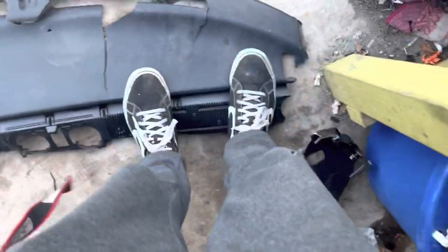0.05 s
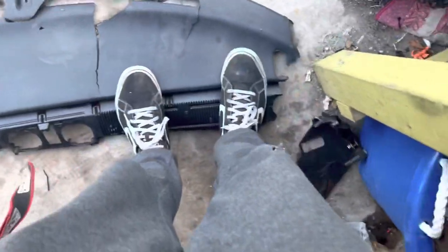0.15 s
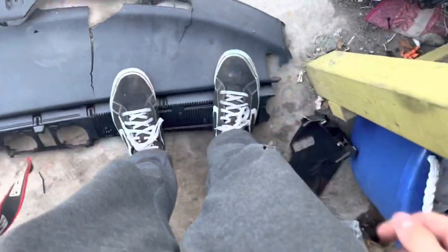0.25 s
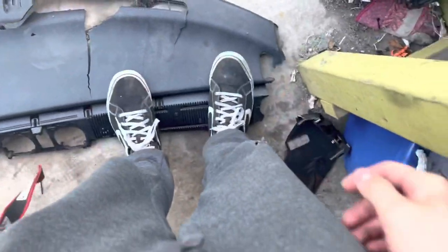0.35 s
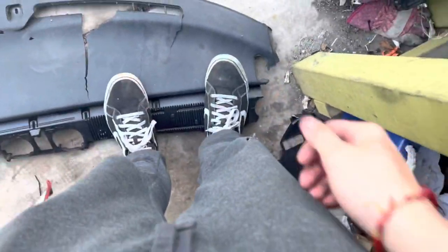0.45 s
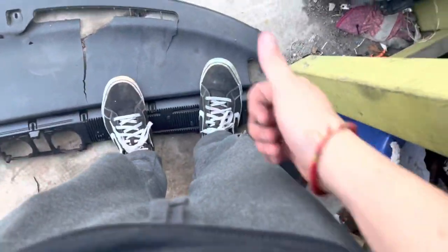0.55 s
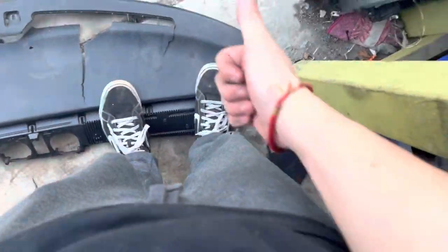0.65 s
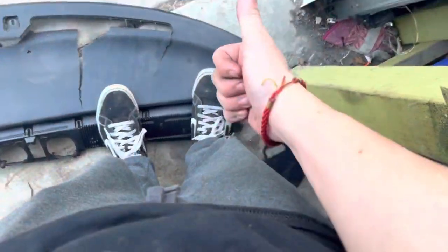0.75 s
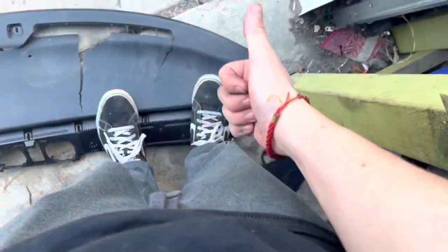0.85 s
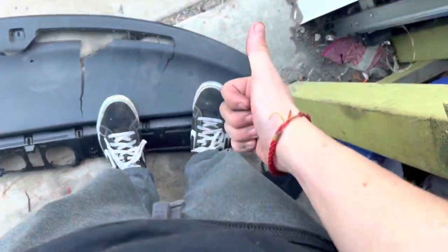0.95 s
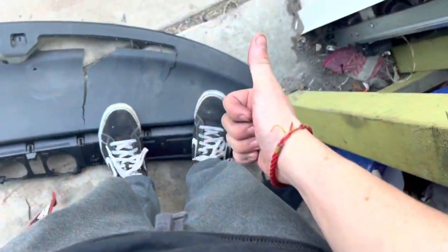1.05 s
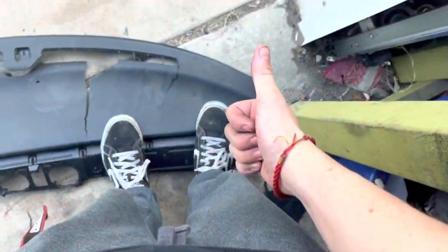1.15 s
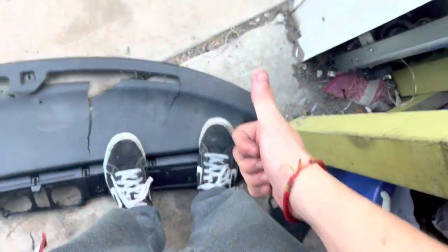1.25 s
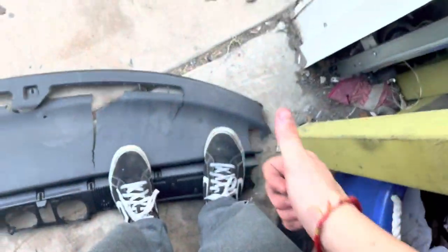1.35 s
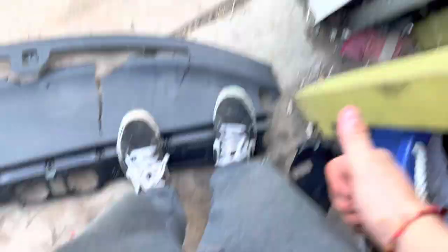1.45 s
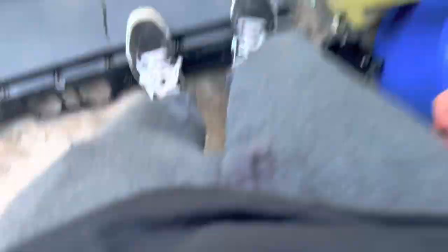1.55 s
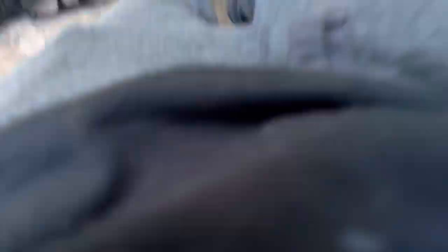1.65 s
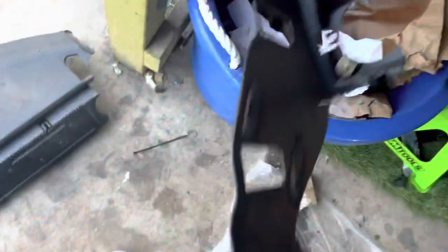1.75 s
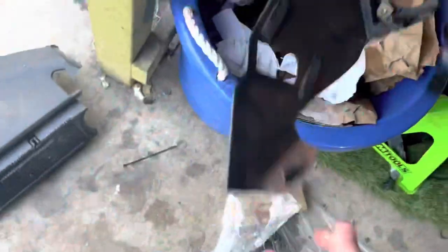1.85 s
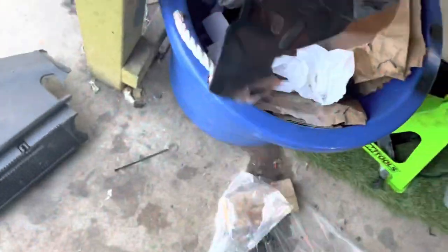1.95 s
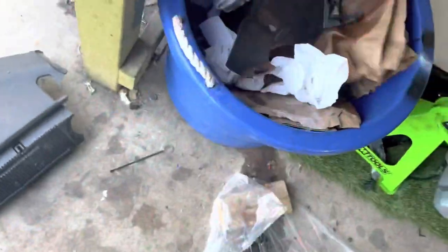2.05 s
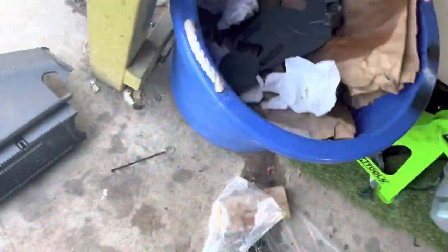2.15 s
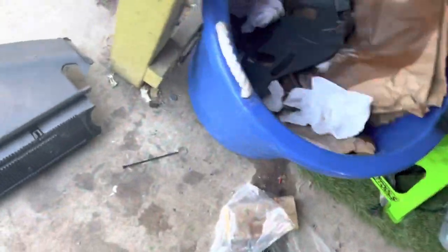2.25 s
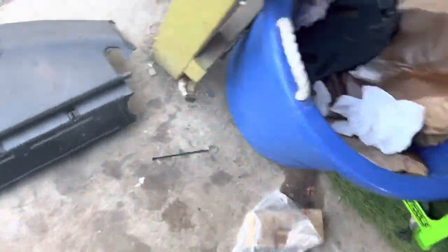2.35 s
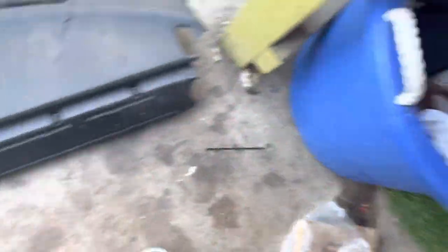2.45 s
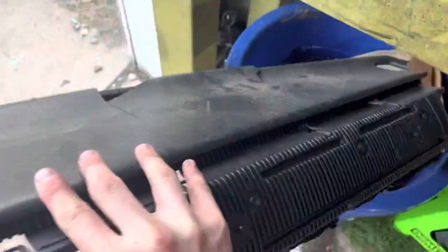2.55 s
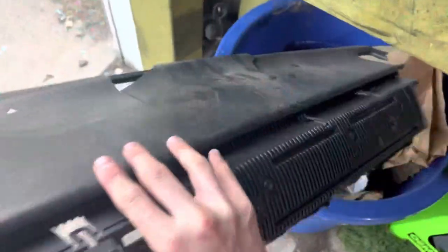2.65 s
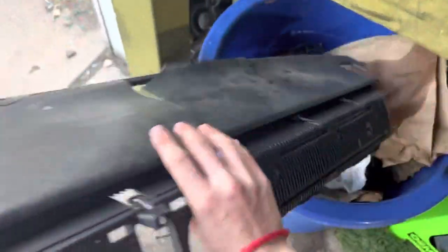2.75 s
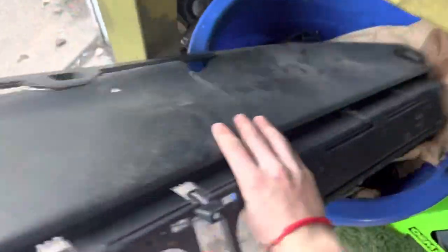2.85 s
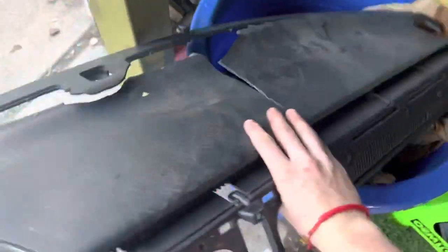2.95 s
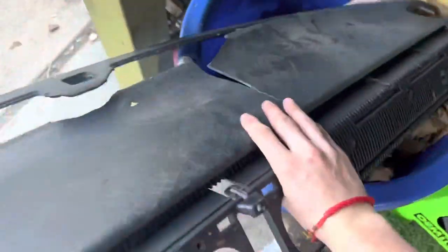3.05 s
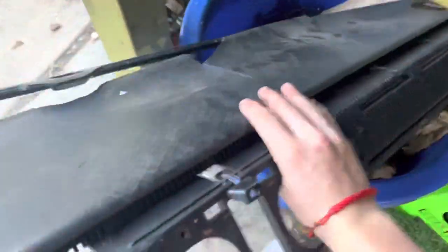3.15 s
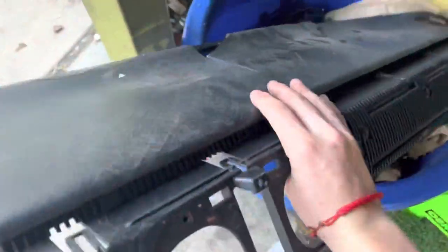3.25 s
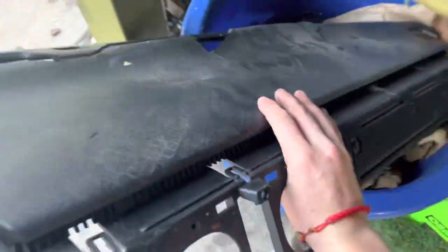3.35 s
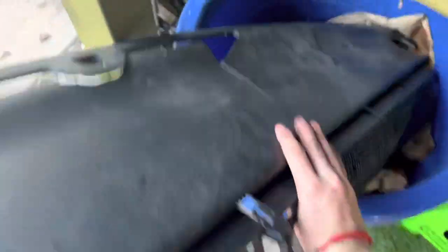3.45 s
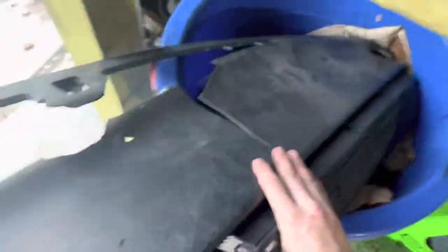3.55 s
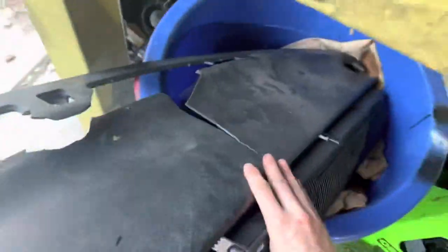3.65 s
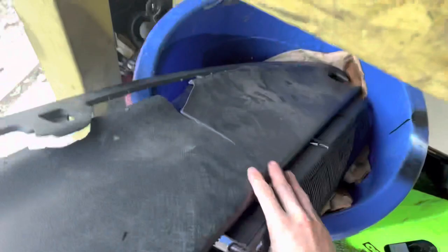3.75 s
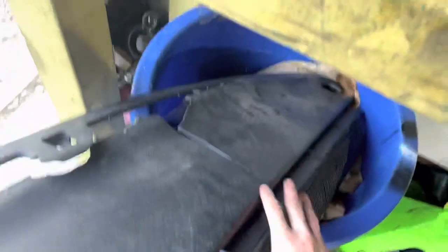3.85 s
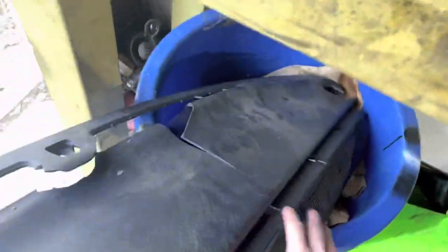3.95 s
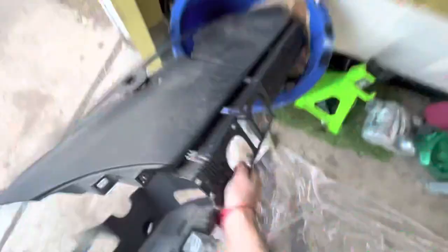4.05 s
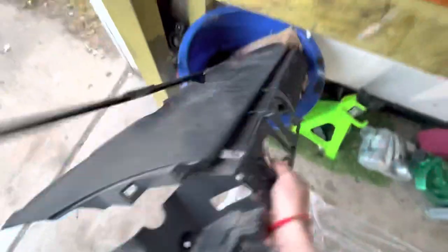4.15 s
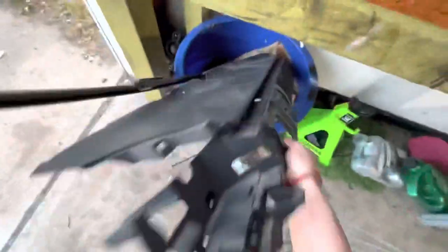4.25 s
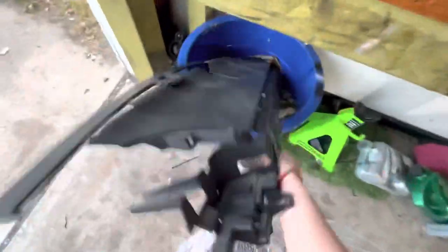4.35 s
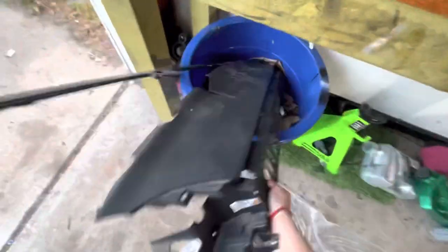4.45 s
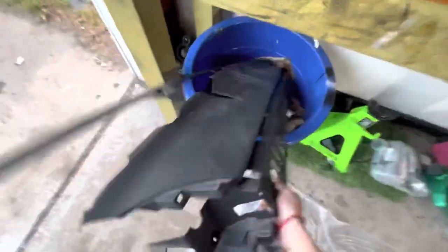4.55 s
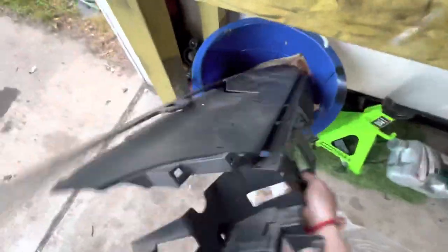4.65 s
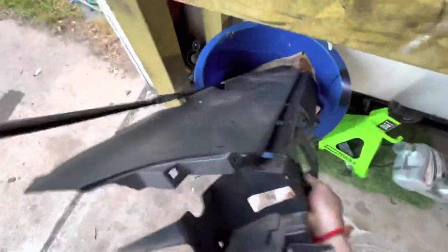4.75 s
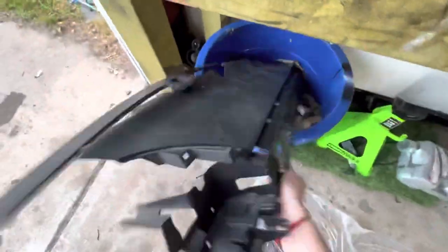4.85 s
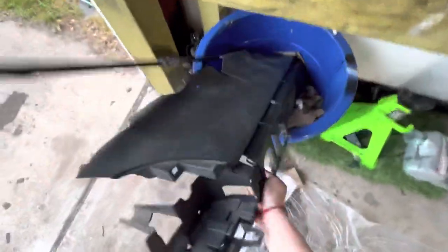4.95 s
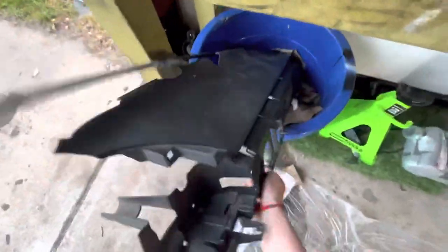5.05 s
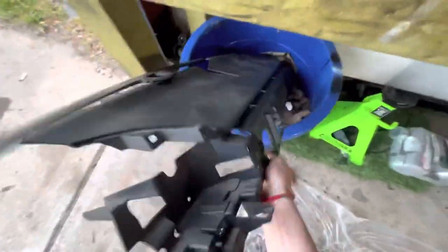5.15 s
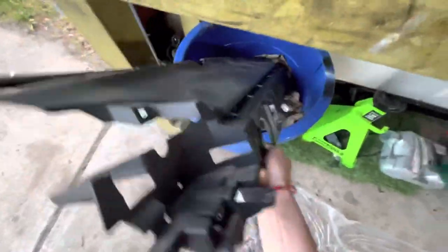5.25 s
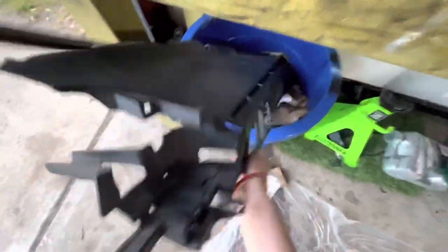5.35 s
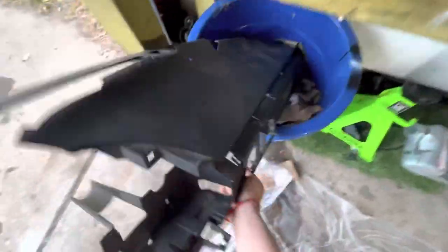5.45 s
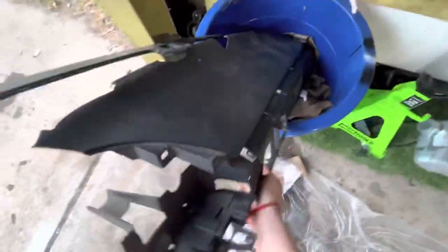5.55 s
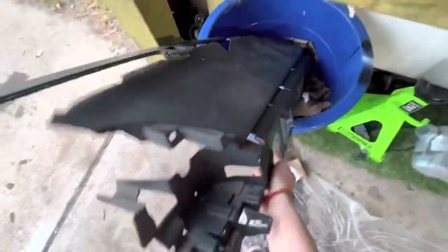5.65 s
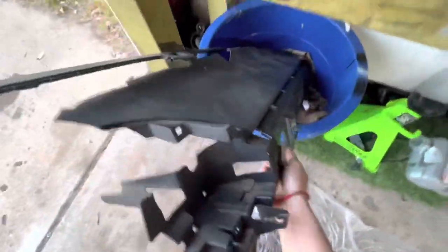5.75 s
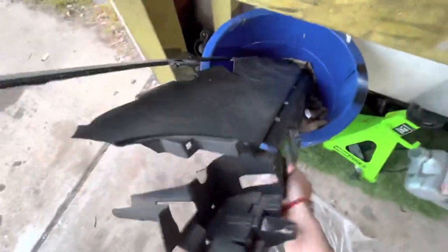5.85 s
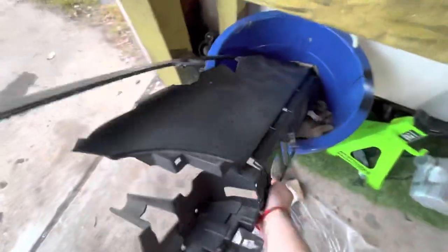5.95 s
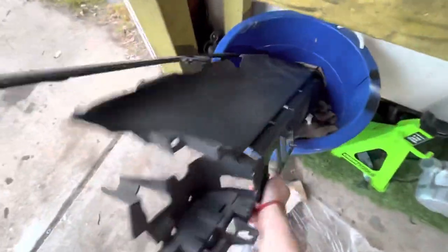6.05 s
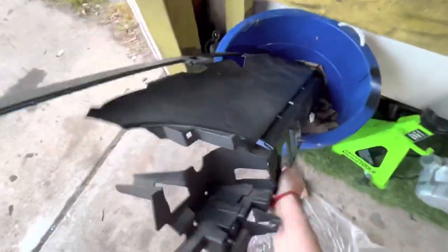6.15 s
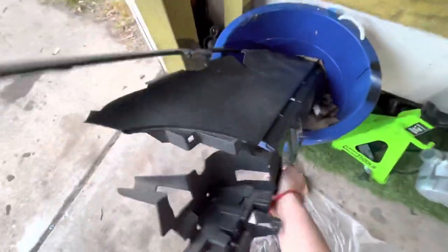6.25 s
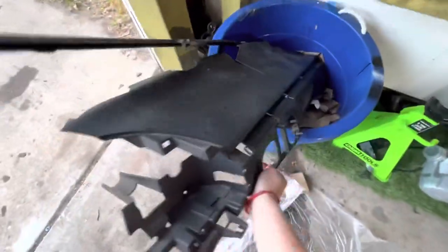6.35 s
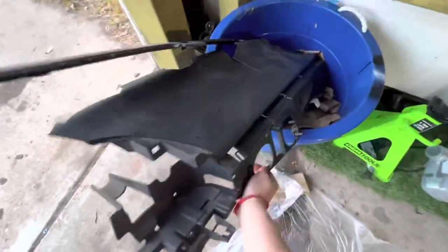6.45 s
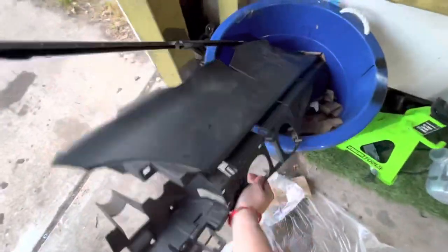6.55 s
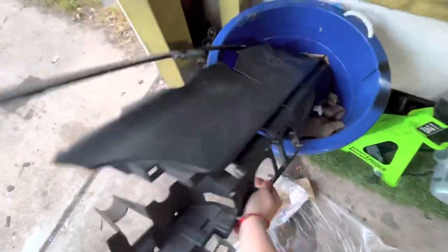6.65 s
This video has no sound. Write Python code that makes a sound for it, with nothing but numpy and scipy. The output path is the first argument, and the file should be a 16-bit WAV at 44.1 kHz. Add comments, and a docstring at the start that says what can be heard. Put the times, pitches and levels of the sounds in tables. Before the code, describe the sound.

A close, dry stereo scene in an open garage with short wall echoes and very low yard noise. From 0 to 0.3 s a brittle plastic panel underfoot gives a rapid cluster of sharp snaps, then small ticks fade to near quiet. A barely audible thin chirp sits far off around 1.0-1.3 s. At 1.5-1.65 s come a hollow knock and four or five loud, bright cracks. After a tiny silent gap, a light piece clatters into a plastic tub at about 2.0 s and settles. Another cut, then at 2.77 s a big hollow bang, with tub thuds, scraping and a deep boom near 3.5 s, easing by 4.0 s. From 4.07 s the panel is forced in: dense creaks, scrapes, crunches and snaps, strongest at 4.3-4.9 and 5.43 s, thinning into lighter crackles after 6 s, with one last snap at 6.68 s.

```python
"""Plastic dashboard cracking into a tub

A brittle plastic dashboard cracks underfoot, then pieces are shoved into a plastic tub full of paper.
Snaps and knocks ring shard and panel modes, thuds boom the tub; clumped slips make flexing, scraping and crunch.
Around them lie an open garage's echoes, a low yard noise and a faint far chirp.
Four passages are joined by short silent gaps, each with its own delay and tone on the left."""
import sys
import numpy as np
from scipy import signal
from scipy.io import wavfile

SR = 44100
rng = np.random.default_rng(int(sys.argv[2]) if len(sys.argv) > 2 else 0)


def wrap_up_sound(samples):
    """Save the sound to the file named by the first command line argument, as 16-bit audio."""
    columns = np.atleast_2d(samples).T
    # keep every value between -1 and 1, then stretch to whole-number steps
    tamed = np.clip(columns, -1, 1)
    steps = np.round(tamed * 32767).astype(np.int16)
    wavfile.write(sys.argv[1], SR, steps)


N = 295029
TIME = np.arange(N) / SR

# resonances of the hollow panel: pitch_hz, level_db, t60_s
PANEL = [(359.7, -5, 0.09), (431, -1, 0.08), (486.3, 3, 0.085), (553, -1, 0.065), (679, -2, 0.05),
         (819.7, -3, 0.045), (1030, -3, 0.05), (1155, -7, 0.05), (1340, -7, 0.05), (1590, -8, 0.035),
         (2005, -12, 0.03), (2420, -13, 0.03)]
# the four passages: start_s, end_s
PASSAGES = [(0, 1.738), (1.748, 2.558), (2.576, 4.058), (4.073, 6.7)]


def from_db(db):
    """dB to gain."""
    return 10 ** (np.asarray(db) / 20)


def rms_one(x):
    """Scale to rms 1."""
    return x / np.sqrt(np.mean(x ** 2) + 1e-20)


def in_time(rows):
    """Columns of a curve, one value a sample."""
    s, *columns = np.transpose(rows)
    return [np.interp(TIME, s, column) for column in columns]


def at_hz(points, hz):
    """Read the second column of a spectrum on a log pitch axis."""
    points = np.array(points)
    return np.interp(np.log(hz), np.log(points[:, 0]), points[:, 1])


def passage_at(s):
    """Index of the passage that holds this moment."""
    return sum(s >= start for start, end in PASSAGES) - 1


def drift(rate):
    """Slow random wander of spread 1, from noise through a two-pole lowpass at rate Hz."""
    step = 40      # computed on every 40th sample only
    r = np.exp(-2 * np.pi * step * rate / SR)
    noise = rng.standard_normal(N // step + 2002)
    slow = signal.lfilter([1], [1, -2 * r, r * r], noise)[2000:]
    return np.interp(np.arange(N) / step, np.arange(len(slow)), rms_one(slow))


def ring(x, hz, t60):
    """A resonator: a unit click sets a decaying sine of starting height 1 ringing."""
    r, w = from_db(-60 / (t60 * SR)), 2 * np.pi * hz / SR
    return signal.lfilter([0, np.sin(w)], [1, -2 * r * np.cos(w), r * r], x + 1e-18)


def coloured(source, spectrum, patchy_db):
    """Stereo noise in bands, each with its own level, flicker and left-right likeness; rms 1."""
    # how alike left and right are: pitch_hz, likeness (0 to 1)
    likeness = [(60, 0.95), (300, 0.99), (700, 0.81), (1500, 0.042), (4000, 0.14), (12000, 0.14)]
    low_hz, top_hz = spectrum[0][0], min(spectrum[-1][0], 19000)
    edges = np.geomspace(low_hz, top_hz, num=2 + int(2.5 * np.log2(top_hz / low_hz)))
    out = 0
    for k, (low, high) in enumerate(zip(edges, edges[1:])):
        band = signal.butter(2, [low, high], "band", fs=SR, output="sos")
        mid, side = signal.sosfilt(band, source[k % 2])      # neighbouring bands use different noise
        hz = np.sqrt(low * high)
        alike = np.clip(at_hz(likeness, hz), -1, 1)
        gain = from_db(at_hz(spectrum, hz) + patchy_db * drift(10.0))
        out = out + gain * (np.sqrt(1 + alike) * mid + np.sqrt(1 - alike) * side * [[1], [-1]])
    return rms_one(out)


def snaps(tear_s=0.0043, crack_t60=0.075):
    """A short tear of noise rings shard and panel modes; a bright crack and a tub thud go with it."""
    # snaps and knocks: start_s, shard_db, shard_hz, panel_db, crack_db, thud_db
    blows = [(0.001, -14, 1020, -13, -28, -62), (0.016, -11.5, 1170, -17, -16, -62),
             (0.027, -12, 1030, -33, -23, -48), (0.114, -54, 2200, -53, -39, -60),
             (0.138, -15, 1010, -20.5, -19, -65), (0.188, -18.5, 654, -39, -24.5, -54),
             (0.202, -15, 960, -33, -26.5, -44), (0.242, -16.5, 1570, -19, -28, -47),
             (0.269, -27, 730, -44, -37, -57), (0.317, -43, 940, -33.5, -41.5, -52),
             (0.396, -59, 2173, -45.5, -34.5, -49), (0.472, -51, 1190, -49, -53, -62),
             (0.511, -52, 2950, -63, -44, -66), (0.525, -66, 2240, -43, -42, -64),
             (0.563, -42, 1490, -40, -50, -61), (0.649, -38.5, 730, -39, -53.5, -67),
             (0.729, -29, 698, -25.5, -41, -65), (0.985, -61, 2080, -71, -54, -64.5),
             (1.376, -51, 700, -43.5, -64, -60), (1.423, -65.5, 1510, -40, -56, -43),
             (1.481, -49, 1590, -24.5, -54, -60), (1.498, -13, 493, -5.5, -35, -58),
             (1.504, -19, 1240, -12, -30.5, -57.5), (1.548, 0, 1250, -10, -15.5, -61),
             (1.573, -2, 1220, -5.5, -17.5, -61), (1.596, -1.5, 1220, -8, -21, -54),
             (1.618, -6, 1277, -14.5, -25.5, -62), (2.009, -25.5, 794, -46.5, -35, -36),
             (2.058, -12, 964, -39, -15, -21), (2.243, -38, 1600, -46, -35.5, -45),
             (2.395, -63, 1393, -60, -51, -34.5), (2.478, -37, 1370, -55, -42, -74),
             (2.581, -19.5, 1180, -34, -38, -44), (2.616, -37, 1140, -22, -44, -40),
             (2.691, -28, 1210, -30.5, -45, -49), (2.771, -0.5, 335, -6.5, -21, -33),
             (2.798, -15, 365, -12, -27, -13), (2.862, -31, 1114, -29, -20, -20),
             (2.91, -35, 935, -18, -23, -26), (2.962, -29, 1300, -42, -45, -17),
             (3.045, -20.5, 1130, -20.5, -49, -21.5), (3.181, -46, 605, -32, -53, -24),
             (3.22, -24, 1250, -47, -43, -25.5), (3.266, -17, 1040, -46, -44, -41),
             (3.301, -24, 1300, -21, -32, -16), (3.399, -22, 1140, -10, -37, -30),
             (3.418, -24, 607, -10.5, -25, -27), (3.478, -13.5, 905, -12, -27, -2.5),
             (3.495, -34, 704, -16, -23, -8), (3.52, -17, 507, -33, -26.5, -16),
             (3.536, -27, 680, -23, -34, -14), (3.587, -90, 1400, -28, -32, -58),
             (3.66, -16, 1423, -46, -34, -28), (3.73, -23, 1610, -29, -53, -21),
             (3.806, -23, 1480, -48, -27.5, -26), (3.89, -29, 2150, -36.5, -36, -47),
             (3.939, -30, 1170, -33.5, -47, -29), (3.985, -48, 2030, -45.5, -43, -55),
             (4.075, -18, 1260, -13, -44, -19), (4.109, -9.5, 1510, -24, -30, -36),
             (4.149, -51, 714, -17.5, -25, -18.5), (4.189, -43, 520, -18.5, -52, -44),
             (4.33, -8, 1073, -31, -21, -34), (4.344, -9, 760, -26, -27, -31),
             (4.436, -17, 3630, -22, -39, -19), (4.465, -3.5, 1440, -35, -24, -39),
             (4.484, -19, 1600, -39, -43, -45), (4.577, -18.5, 1230, -47, -31, -34),
             (4.619, -6.5, 1370, -29, -16, -58), (4.729, -18.5, 1144, -18, -44, -21.5),
             (4.835, -16, 1040, -31, -29, -43), (4.887, -10, 840, -15, -15.5, -27),
             (4.894, -25, 830, -13, -25, -12), (4.912, -14, 850, -11, -39, -16),
             (4.983, -20.5, 1340, -21, -27.5, -39.5), (5.032, -16.5, 1370, -17.5, -30, -26),
             (5.126, -20.5, 1590, -27, -35, -43), (5.247, -17.5, 962, -27.5, -39, -64),
             (5.303, -45, 1030, -25.5, -25, -43), (5.431, -6, 856, -28, -24.5, -17),
             (5.439, -34, 807, -34, -54, -13), (5.469, -27, 750, -17, -42, -24),
             (5.517, -20, 1380, -33, -29, -37), (5.548, -19, 810, -19.5, -32, -59),
             (5.624, -35, 760, -18, -60, -42), (5.688, -25, 766, -24, -31, -43),
             (5.903, -19.5, 797, -26, -62, -22), (5.911, -32.5, 800, -37, -38, -21),
             (5.96, -21.5, 855, -41, -32, -38), (5.972, -32, 865, -37, -31.5, -21),
             (5.992, -25, 1320, -17.5, -41, -16), (6.001, -16, 383, -35, -38, -16),
             (6.047, -18.5, 750, -42, -54, -35), (6.091, -23, 1410, -36, -43, -36),
             (6.116, -15, 1470, -22, -28.5, -47), (6.126, -22, 955, -23.5, -32, -44),
             (6.145, -24, 1480, -44, -36, -44), (6.204, -39, 740, -51, -65, -30),
             (6.25, -46, 1340, -50, -37, -52), (6.285, -19.5, 870, -49, -48, -20),
             (6.297, -47, 910, -24, -50, -31), (6.329, -33, 750, -27, -33, -45),
             (6.393, -37, 1320, -52, -30.5, -52), (6.488, -29, 2170, -55, -31.5, -37),
             (6.68, -6.5, 1550, -20.5, -28, -52)]
    # resonances of the tub: pitch_hz, level_db, t60_s
    tub = [(68, -7.5, 0.23), (89, -1, 0.049), (137, 6, 0.084), (160, -8, 0.062), (220, 0, 0.099)]
    # modes of a shard: pitch_ratio, level_db, share of the shard's t60
    shard_modes = [(.63, -6, .9), (.8, -5, .8), (.91, -6, 1.3), (1, 0, 1), (1.13, -4, .8), (1.45, -11, .7),
                   (2.04, -3, .8), (3.6, -8, .6)]
    # decay of the shard's main mode, one a passage: t60_s
    shard_t60_s = [.015, .02, .024, .023]
    # extra level of the shard modes beside the main one, one a passage: level_db
    shard_side_db = [-1, -2, -5, -8]
    # mean pitch of the crack's edge, one a passage: pitch_hz
    crack_edge_hz = [3180, 3470, 4000, 4820]
    build_s = 0.002      # a snap takes a moment to build
    detune = 0.04      # the panel bends, so its modes shift from blow to blow

    size = SR // 5
    t, out = np.arange(size) / SR, np.zeros((2, N + size))
    noise = rng.standard_normal((len(blows), 3, size))
    strengths_db = 2.8 * rng.standard_normal((len(blows), len(PANEL) + len(tub)))
    bends = 1 + detune * rng.standard_normal((len(blows), len(PANEL) + 1))
    build = 1 - np.exp(-t / build_s)
    bright = signal.butter(1, [1700, 15500], "band", fs=SR, output="sos")
    thin = signal.butter(6, 335, "high", fs=SR, output="sos")      # a thin panel radiates no bass
    push = np.sin(np.pi * np.clip(t / 0.0058, 0, 1)) ** 2      # soft contact
    booms = np.array([from_db(db) * ring(push, hz, t60) for hz, db, t60 in tub])

    for row, draw, hit_db, bend in zip(blows, noise, strengths_db, bends):
        s, shard_db, shard_hz, panel_db, crack_db, thud_db = row
        passage = passage_at(s)
        t60, side_db = shard_t60_s[passage], shard_side_db[passage]
        crack_hz = crack_edge_hz[passage] * bend[-1] ** 3
        tear = draw[0] * np.exp(-t / tear_s)

        blow = np.exp(-t / 0.00008) * 5.0 + 0.18 * tear      # a sharp blow with a frayed end
        shard = 0
        for k, (ratio, mode_db, share) in enumerate(shard_modes):
            gain = (-1) ** k * from_db(mode_db + side_db * (mode_db < 0))
            shard = shard + gain * ring(blow, shard_hz * ratio, t60 * share)
        shard = build * shard

        knock = np.exp(-t / 0.000065) + 0.25 * tear      # the panel takes one firm blow
        panel = 0
        for (hz, mode_db, mode_t60), change_db, shift in zip(PANEL, hit_db, bend):
            gain = np.sign(change_db) * from_db(mode_db + change_db)      # random polarity
            panel = panel + gain * ring(knock, hz * shift, mode_t60)
        panel = np.sqrt(build) * panel

        fade = 0.9 * from_db(-60 * t / crack_t60) + np.exp(-t / tear_s)
        burst = (draw[0] + 0.5 * draw[1:]) * fade      # partly shared by left and right
        crack = signal.sosfilt(bright, burst) + 0.22 * ring(burst, crack_hz, 0.0025)
        thud = from_db(0.83 * hit_db[len(PANEL):]) @ booms

        rings = from_db(shard_db) * shard / np.abs(shard).max()
        rings = rings + from_db(panel_db) * panel / np.abs(panel).max()
        at = round(s * SR)
        out[:, at:at + size] += (signal.sosfilt(thin, rings) + from_db(crack_db) * crack
                                 + from_db(thud_db) * thud / np.abs(thud).max())
    return out[:, :N]


def handling():
    """Flexing rumbles, scraping edges and crunching paper follow the push of foot or hand."""
    # noise spectra, relative density per Hz: pitch_hz, level_db
    flex_spectrum = [(32, -25), (54, -12.5), (118, -0.5), (200, -2.5), (282, -9), (400, -4), (520, -22.5),
                     (880, -57.5)]
    scrape_spectrum = [(88, -43.5), (150, -1), (281, -8.5), (469, -8), (603, -2.5), (835, -3), (1820, -9.5),
                       (3000, -15.5), (3900, -59.5), (6600, -120)]
    crunch_spectrum = [(760, -17), (1300, -6.5), (1830, -10), (4190, -6), (8180, -14), (10900, -7),
                       (12500, -44.5), (15200, -9.5), (16000, -24), (16500, -42)]
    flexing, scraping, crunching = pushing()
    # slips come in clumps that all layers share; only the rarer ones reach the low modes
    # the limits below are slips per second before clumping
    chance = rng.random(N) * SR / from_db(5.0 * drift(45) + 1.5 * drift(9))
    flex = coloured(slips(chance < 150, 1.2, 0.5), flex_spectrum, patchy_db=2.0)
    scrape = coloured(slips(chance < 600, 2.5, 0.75), scrape_spectrum, patchy_db=2.5)
    scrape = scrape + from_db(-4.5) * creaks()
    # the hollow under the panel hums along
    scrape += from_db(-13.0) * rms_one(ring(scrape.mean(axis=0), 482, 0.063))
    crunch = coloured(slips(chance < 2500, 2.1, 0.75), crunch_spectrum, patchy_db=2.5)
    crunch = crunch + from_db(-2.5) * crackle(chance < 700)
    return flexing * flex + scraping * scrape + crunching * crunch


def pushing():
    """Every push swells to its peak and dies away within its passage; layer levels add as power."""
    # pushes of foot or hand: peak_s, rise_s, fall_s (before lingering), flex_db, scrape_db, crunch_db
    pushes = [(0.0, 0.011, 0.34, -62, -34.5, -40.5), (0.22, 0.12, 0.065, -35, -47, -53),
              (0.33, 0.2, 0.4, -69, -49, -59), (0.56, 0.11, 0.17, -62, -53.5, -63),
              (0.8, 0.13, 0.046, -68, -57.5, -73), (1.545, 0.1, 0.13, -64, -33, -39),
              (1.7, .15, 0.13, -64, -49, -58.5), (1.796, 0.07, 0.029, -60, -59, -52),
              (2.011, 0.0043, 0.26, -33.5, -32, -41), (2.058, 0.0017, 0.28, -33.5, -33.5, -27),
              (2.24, 0.12, 0.2, -65, -41.5, -45.5), (2.4, 0.023, 0.27, -55, -71.5, -46.5),
              (2.5, 0.043, 0.1, -54, -47.5, -47), (2.579, 0.0033, 0.9, -34.5, -39, -50.5),
              (2.77, 0.0083, 0.11, -14.5, -13.5, -18), (2.881, 0.059, 0.3, -22, -24.5, -24),
              (3.264, 0.008, 0.18, -29.5, -28, -30), (3.414, 0.082, 0.11, -22.5, -24.5, -20.5),
              (3.489, 0.067, 0.13, -17, -18.5, -26), (3.662, 0.0025, 0.03, -27, -35, -23),
              (3.71, 0.14, 0.61, -35.5, -38, -37), (4.076, 0.0084, 0.18, -22.5, -18, -22),
              (4.345, 0.12, 0.12, -20.5, -19, -17.5), (4.44, 0.16, 0.19, -26, -23.5, -26.5),
              (4.625, 0.022, 0.14, -22, -17.5, -23.5), (4.73, 0.063, 0.15, -28.5, -46, -35.5),
              (4.898, 0.1, 0.054, -17.5, -17, -17), (4.949, 0.37, 0.78, -29, -29, -32),
              (5.304, 0.012, 0.15, -40, -33, -31.5), (5.4, 0.056, 0.28, -44, -58, -34),
              (5.428, 0.0027, 0.12, -17, -18, -26), (5.596, 0.42, 0.47, -29, -31.5, -37.5),
              (5.905, 0.03, 0.16, -27.5, -48, -33.5), (5.984, 0.083, 0.54, -31.5, -31, -36),
              (6.295, 0.032, 0.18, -30, -56, -35.5), (6.66, 1, 0.42, -43.5, -47.5, -51.5)]
    # the heavy parts answer later; flex, scrape, crunch: delay_s
    late_s = np.array([0.013, 0.00094, 0])[:, None]
    # how long flex, scrape and crunch outlast the push: factor on fall_s
    linger = np.array([0.73, 0.96, 1.2])[:, None]
    # flex, scrape and crunch between pushes: level_db
    rest_db = [-67.5, -84, -110]
    swing_db = 20      # rise and fall are timed over this step

    grid_s = np.arange(0, N / SR, 0.001)
    power = from_db(rest_db)[:, None] ** 2 * np.ones(len(grid_s))
    for s, rise_s, fall_s, *levels_db in pushes:
        late = grid_s - s - late_s
        start, end = PASSAGES[passage_at(s)]
        steps = np.where(late < 0, -late / rise_s, late / (fall_s * linger))
        level_db = np.array(levels_db)[:, None] - swing_db * steps
        power += from_db(level_db) ** 2 * (grid_s >= start) * (grid_s < end)
    return [np.interp(TIME, grid_s, level) for level in np.sqrt(power)]


def slips(born, spread_db, smooth):
    """Stick-slip clicks of uneven size on a share of smooth noise."""
    sizes = from_db(spread_db * np.minimum(rng.exponential(1, N), 5)) * rng.standard_normal((2, 2, N))
    return rms_one(sizes * born) + smooth * rng.standard_normal((2, 2, N))


def creaks(per_s=250, t60_cycles=46.0):
    """Random slips dealt to the panel modes: short blips of pitch inside the scrape."""
    born = rng.random(N) < per_s * from_db(5.0 * drift(20)) / SR
    sizes = from_db(4.0 * np.minimum(rng.exponential(1, N), 4))
    dealt = rng.integers(0, len(PANEL), N)
    out = 0
    for k, (hz, db, _) in enumerate(PANEL):
        out = out + from_db(0.5 * db) * ring(sizes * born * (dealt == k), hz, t60_cycles / hz)
    return rms_one(out)


def crackle(born, t60_cycles=30.0):
    """Tiny fractures: short ticks dealt to sixteen pitches, each pitch at its own place left to right."""
    scatter_db = 5      # most that a side gains or loses
    pitches = np.geomspace(1300, 9000, num=16)
    sizes = from_db(2.9 * np.minimum(rng.exponential(1, N), 4)) * born
    dealt, sides = rng.integers(0, len(pitches), N), rng.uniform(-1, 1, len(pitches))
    out = 0
    for k, (hz, side) in enumerate(zip(pitches, sides)):
        pan = from_db([[scatter_db * side], [-scatter_db * side]])
        out = out + ring(sizes * (dealt == k), hz, t60_cycles / hz) * pan
    return rms_one(out)


def garage(x):
    """Echoes between walls: ten feedback delays a side, duller on every round, without bass."""
    low_t60_s, wall_cut_hz = 0.17, 5000      # the walls soak up treble, so it dies sooner
    out, dull = np.zeros((2, N)), np.exp(-2 * np.pi * wall_cut_hz / SR)
    lags = (rng.uniform(0.007, 0.034, size=20) * SR).astype(int)
    for k, lag in enumerate(lags):
        loop, gain, state = x.copy(), from_db(-60 * lag / SR / low_t60_s), [0.]
        for i in range(lag, N, lag):
            back, state = signal.lfilter([gain * (1 - dull)], [1, -dull], loop[i - lag:i], zi=state)
            loop[i:i + lag] += back[:N - i]
        out[k % 2] += (loop - x) * (-1) ** (k // 2)
    return signal.sosfilt(signal.butter(2, 300, "high", fs=SR, output="sos"), out)


def yard():
    """Steady, mostly low noise of the open yard."""
    # relative density per Hz: pitch_hz, level_db
    yard_spectrum = [(15, -41.5), (25, -25.5), (38, -3.5), (86, -8), (139, -25), (716, -30.5), (5180, -60),
                     (5850, -40), (8000, -66), (10400, -94), (17600, -120)]
    return from_db(-58.5) * coloured(rng.standard_normal((2, 2, N)), yard_spectrum, patchy_db=0.5)


def chirping():
    """A thin far tone, rough because its pitch and level jitter."""
    # faint far chirping, mean course: start_s, pitch_hz, level_db
    chirp = [(1.0, 6130, -89), (1.04, 6020, -71), (1.15, 5730, -75.5), (1.25, 5820, -82),
             (1.34, 5830, -87.5)]
    hz, db = in_time(chirp)
    tone = np.sin(2 * np.pi * np.cumsum(hz + 130 * drift(300)) / SR)
    return tone * from_db(db + 4.7 * drift(50)) * (TIME > chirp[0][0]) * (TIME < chirp[-1][0])


def scene():
    """All sources in their space; only snaps and knocks excite the garage."""
    hits = snaps()
    echoes = from_db(-13) * garage(hits.mean(axis=0))
    return hits + echoes + handling() + yard() + chirping()


def record(dry):
    """Delay and colour the left by passage, fade joins, drop deep bass and a treble band, round peaks, cut top."""
    # delay of the left port, one a passage: delay_ms
    left_lag_ms = [0.04, 0.025, 0.099, 0.238]
    # the left port is weaker in the middle range, one a passage: level_db
    left_mid_db = [-2, -5, -2.5, -4]
    # the treble dips between these edges: pitch_hz
    dip_hz = [10920, 14580]
    lag_ms, mid_db, gate = np.zeros((3, N))
    for (start, end), ms, db in zip(PASSAGES, left_lag_ms, left_mid_db):
        lag_ms[TIME >= start], mid_db[TIME >= start] = ms, db
        gate += np.clip((TIME - start) / 0.0019, 0, 1) * np.clip((end - TIME) / 0.0014, 0, 1)
    # doubled sample rate, for delays finer than a sample
    fine = signal.resample_poly(dry[0], up=2, down=1)
    left = np.interp(TIME - lag_ms / 1000, np.arange(2 * N) / (2 * SR), fine)
    middle = signal.butter(1, [200, 4000], "band", fs=SR, output="sos")
    left += (from_db(mid_db) - 1) * signal.sosfilt(middle, left)
    wet = signal.sosfilt(signal.butter(4, 54, "high", fs=SR, output="sos"), [left, dry[1]]) * gate
    rounded = 1.13 * np.tanh(wet / 1.184)
    wet = signal.sosfilt(signal.butter(2, dip_hz, "bandstop", fs=SR, output="sos"), rounded)
    return signal.sosfilt(signal.cheby2(12, 70, 16800, fs=SR, output="sos"), wet)


dry = scene()
out = record(dry)
wrap_up_sound(out)
```